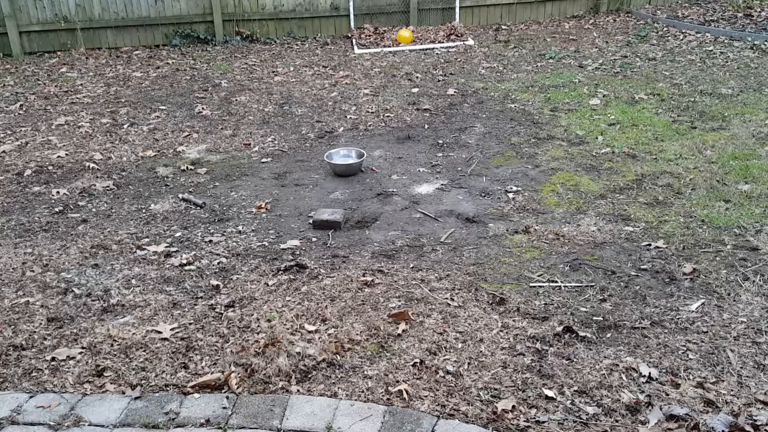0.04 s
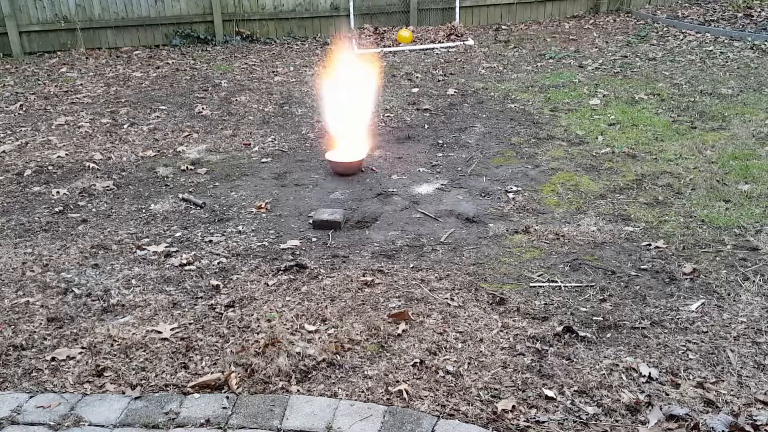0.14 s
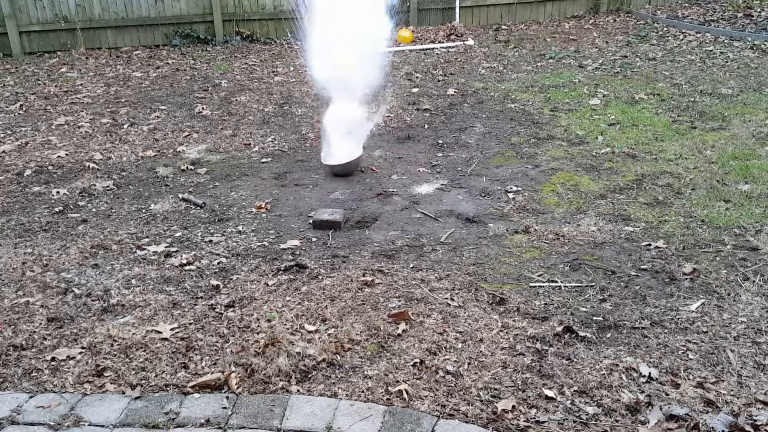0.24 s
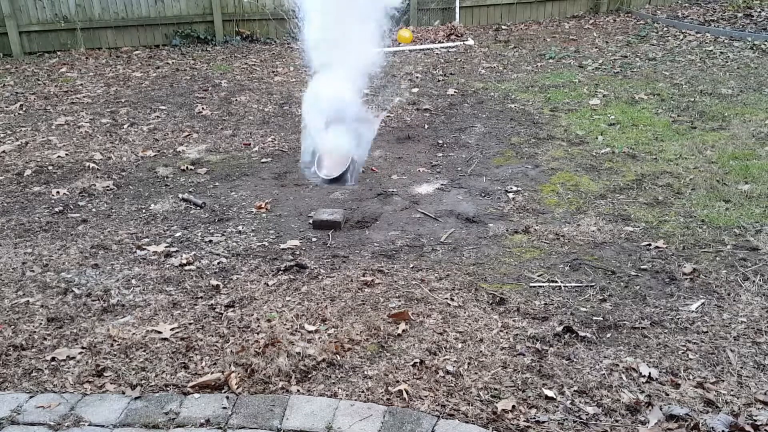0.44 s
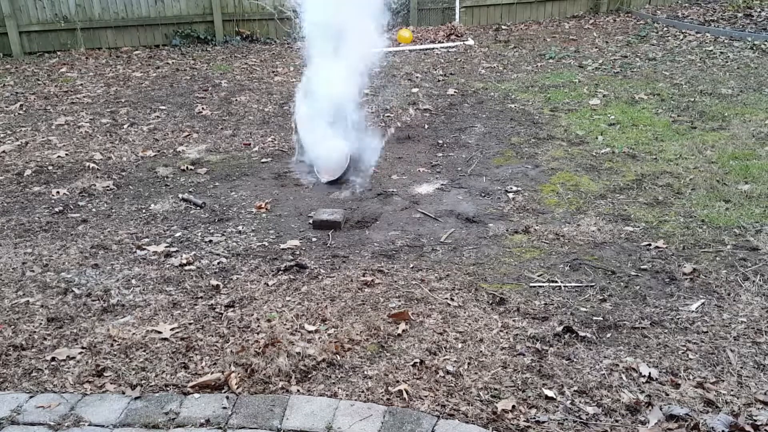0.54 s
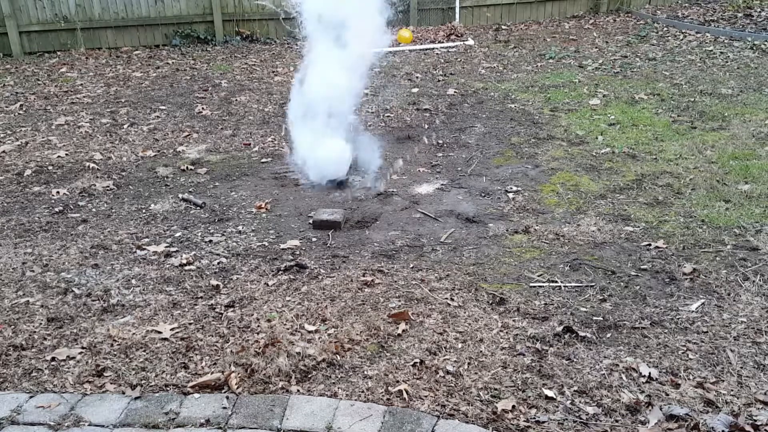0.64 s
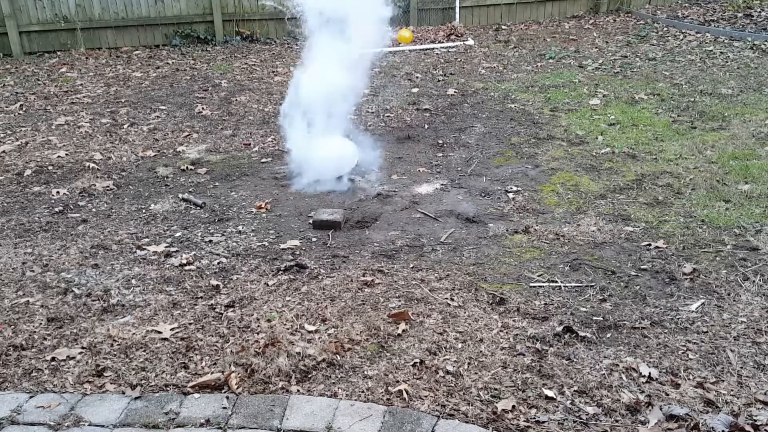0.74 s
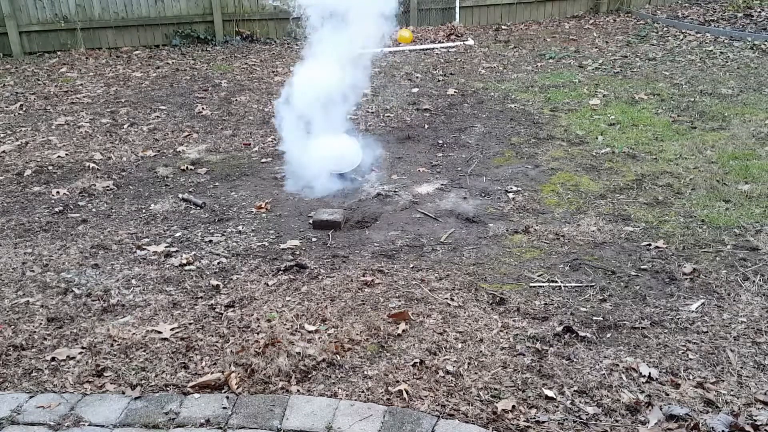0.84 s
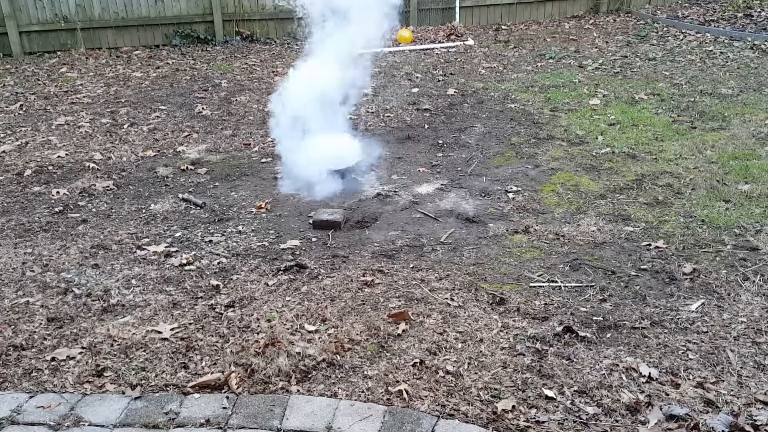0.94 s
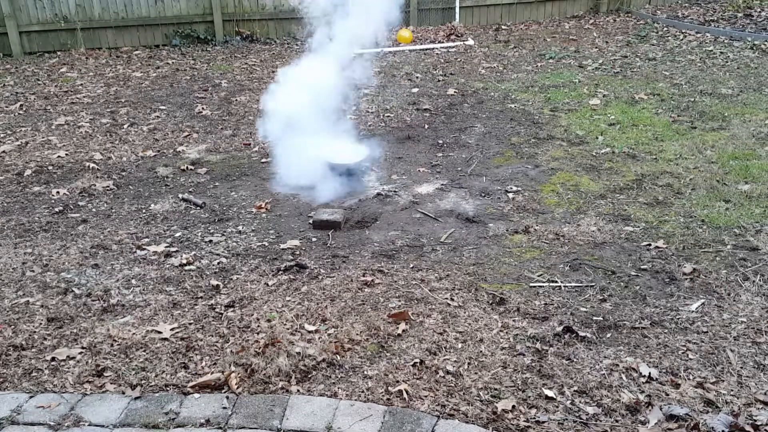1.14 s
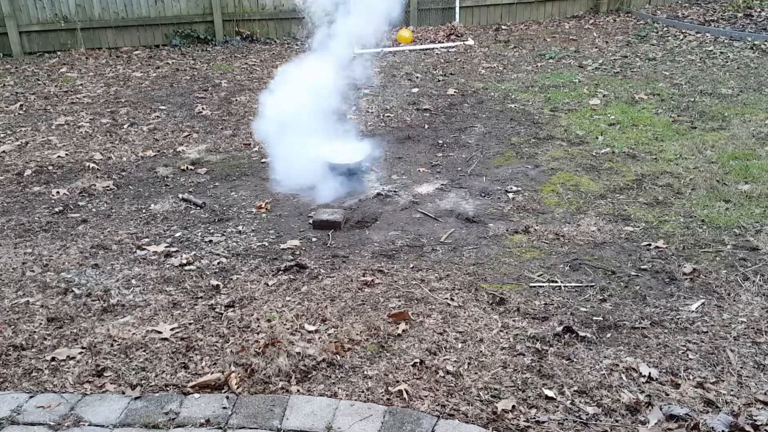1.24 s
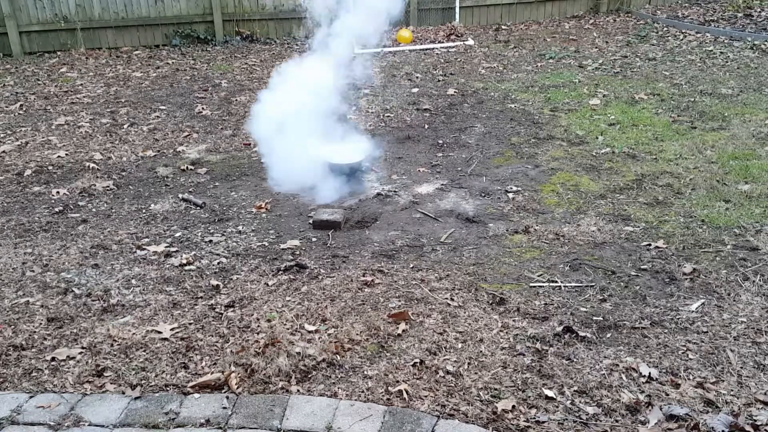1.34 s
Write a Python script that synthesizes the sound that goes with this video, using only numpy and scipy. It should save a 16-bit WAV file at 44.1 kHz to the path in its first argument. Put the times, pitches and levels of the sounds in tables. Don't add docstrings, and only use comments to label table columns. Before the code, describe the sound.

An explosion of reactive metal in water dominates. Quiet suburban air with a very faint insect tone leads to a tiny thump and a sharp, clipped bang at 0.22 seconds, with a brief tearing burst. Hard echo slaps crowd 0.26-0.47 and decay over the next half second into a dull far murmur. From about 0.7, soft hissing patter and dry pops fall on leaves, strongest near 0.78, 1.06 and 1.2.

```python
import sys
import numpy as np
from scipy import signal
from scipy.fft import rfft, irfft, next_fast_len
from scipy.io import wavfile
from scipy.ndimage import uniform_filter1d

SR = 44100
rng = np.random.default_rng(int(sys.argv[2]) if len(sys.argv) > 2 else 0)


def digitize_waveform(pressure):
    field = np.atleast_2d(pressure).T
    bounded = np.clip(field, -1, 1)
    quanta = np.round(bounded * 32767).astype(np.int16)
    wavfile.write(sys.argv[1], SR, quanta)


def volts_from_db(level):
    exponent = np.asarray(level, float) / 20
    return 10 ** exponent


N = 61739
T, M = np.arange(N) / SR, next_fast_len(N)
HZ = np.maximum(np.fft.rfftfreq(M, 1 / SR), 1)
BANG_S = 0.2224
OPPOSITE = np.array([[1], [-1]])


def wave(spectrum):
    return irfft(spectrum, M)[..., :N]


def curve(points, hz):
    p = np.array(points, float)
    return np.interp(np.log(hz), np.log(p[:, 0]), p[:, 1])


def unit(x):
    return x / np.sqrt(np.mean(x ** 2))


def burst(start_s, rise_s, t60_s, hold_s=0.):
    t = np.maximum(T - start_s, 0)
    rise = 1 - np.exp(-t / max(rise_s, 1e-4))
    return rise * volts_from_db(-60 * np.maximum(t - hold_s, 0) / t60_s)


def walk(rate_hz):
    k = int(SR / rate_hz)
    steps = np.repeat(rng.standard_normal(N // k + 1), k)
    return unit(uniform_filter1d(uniform_filter1d(steps, k), k)[:N])


def spread(colour, like=0.94):
    # f/Hz, left-right correlation
    likeness = [(60, 1), (150, 1), (300, 0.94), (640, 0.33), (1400, 0.094), (3100, 0.054), (6800, -0.2),
                (15000, 0)]
    c = np.clip(like * curve(likeness, HZ), -.99, .99)
    mid, side = rfft(rng.standard_normal((2, M))) * volts_from_db(curve(colour, HZ))
    both = np.sqrt(1 + c) * mid + np.sqrt(1 - c) * side * OPPOSITE
    return both / np.sqrt(np.mean(wave(both) ** 2))


def bands(spectrum, shape):
    out = 0
    for hz in 25 * 2 ** np.arange(0, 10, .5):
        window = np.cos(np.pi * np.clip(np.log2(HZ / hz), -.5, .5)) ** 2
        out = out + wave(spectrum * window) * shape(hz)
    return out


def bandpass(x, hz, octaves):
    half = 2 ** (octaves / 2)
    edges_hz = [hz / half, min(hz * half, .45 * SR)]
    return signal.sosfilt(signal.butter(2, edges_hz, "bandpass", fs=SR, output="sos"), x)


def suburb():
    # f/Hz, density/dB
    air_colour = [(25, -18.5), (75, 1), (310, -7.5), (700, -10.5), (1400, -17), (2700, -15.5), (6300, -20),
                  (16000, -22)]
    air_db, insect_db, insect_hz = -57, -76, 2620
    duck_db, recover_s = -7.5, 3
    air = bands(spread(air_colour), lambda hz: volts_from_db(0.5 * walk(8.13)))
    insect = unit(bandpass(rng.standard_normal((2, N)), insect_hz, .1)) * volts_from_db(insect_db + 3 * walk(12))
    recovery = np.exp(-np.maximum(T - BANG_S, 0) / recover_s)
    return (volts_from_db(air_db) * air + insect) * volts_from_db(duck_db * (T > BANG_S) * recovery)


def blast():
    # f/Hz, density/dB
    fire_colour = [(40, -36), (80, -15.5), (150, -14.5), (480, -1), (900, -6.5), (1800, -1.5), (4300, -12),
                   (16000, -25)]
    soil_s, soil_hz, soil_db, soil_rise_s = .2188, 520, -17, .003
    shock_s, shock_db = .14e-3, -6
    fire_db, rise_s, hold_s, t60_1k_s = -3.5, 0.0004, 0.024, 0.11

    thump = np.sin(2 * np.pi * soil_hz * (T - soil_s))
    soil = volts_from_db(soil_db) * thump * burst(soil_s, soil_rise_s, .05)

    u = (T - BANG_S) / shock_s
    shock = -volts_from_db(shock_db) * np.where((u > 0) & (u < 4), np.sin(2 * np.pi * u), 0)

    lumps_db = 1.3 * walk(151.35)

    def tearing(hz):
        fade = burst(BANG_S, rise_s + .6 / hz, t60_1k_s * (1000 / hz) ** 0.35, hold_s)
        return volts_from_db(lumps_db + 4.5 * walk(250)) * fade

    return soil + shock + volts_from_db(fire_db) * bands(spread(fire_colour, like=0.4022), tearing)


def yard():
    # f/Hz, density/dB
    echo_colour = [(40, -41.5), (90, -24), (180, -12), (680, 0.5), (1050, -4), (2200, -6.5), (5000, -20.5),
                   (16000, -27)]
    # f/Hz, t60/s
    echo_t60 = [(60, 1.2), (170, 1.1), (400, 0.69), (1200, 0.8), (3000, 0.68), (6000, 0.58), (9500, 0.46),
                (15000, .31)]
    # t/s, level/dB, centre f/Hz
    slaps = [(0.2567, -4.5, 660), (.266, -8.5, 389), (0.282, -9.5, 462), (.292, -14.5, 640),
             (0.297, -25, 2020), (0.303, -10, 580), (0.31, -8.5, 516), (0.318, -34, 1990),
             (.319, -13.5, 590), (0.33, -12, 594), (0.38, -24, 664), (0.402, -22.5, 563),
             (0.449, -20.5, 714), (0.466, -28, 960)]
    echo_db, rise_s, hold_s = -8, 0.033, 0.017
    patchy_db, swell_db = 1.5, .7
    slap_rise_s, slap_t60_s, slap_hold_s = .0015, .022, 0.0047

    swell = swell_db * walk(70)

    def decay(hz):
        return volts_from_db(swell + patchy_db * walk(80)) * burst(BANG_S, rise_s, curve(echo_t60, hz), hold_s)

    out = volts_from_db(echo_db) * bands(spread(echo_colour), decay)
    for s, db, hz in slaps:
        mid, side = rng.standard_normal((2, N))
        slap = unit(bandpass(mid + .4 * side * OPPOSITE, hz, 0.48))
        out = out + volts_from_db(db) * slap * burst(s, slap_rise_s, slap_t60_s, slap_hold_s)
    return out


def far_murmur():
    # f/Hz, density/dB
    far_colour = [(40, -23.5), (90, -2), (200, -9), (620, -0.1), (1150, -5), (2200, -11.5), (3300, -24),
                  (6000, -42)]
    # t/s, level/dB
    far_level = [(.3, -46), (.7, -47.5), (.9, -48.5), (1.03, -52), (1.15, -49.5), (1.4, -50)]
    p = np.array(far_level)
    roll = volts_from_db(np.interp(T, p[:, 0], p[:, 1])) * burst(BANG_S, .05, 1e4)
    return roll * bands(spread(far_colour), lambda hz: volts_from_db(1.3 * walk(5)))


def patter():
    # f/Hz, density/dB
    click_colour = [(1200, -40), (2600, -18), (3600, -4), (5200, -2), (8500, -8), (16000, -7)]
    # t/s, level/dB, t60/s, top octave/dB
    showers = [
        (.74, -61, .7, 3),
        (.779, -58, .45, 2),
        (.81, -63, .2, 3),
        (1.062, -55, .14, -10),
        (1.078, -58.5, .4, -6),
        (1.164, -59.5, .3, 3),
        (1.223, -58, .45, 3),
        (1.3, -66, 3, 5),
        (1.365, -66, 1, 5),
    ]
    rate_hz, spread_db, floor_db, top_octave_hz = 5000, 2, -72, 9500

    hits = (rng.random((2, N)) < rate_hz / SR) * rng.standard_normal((2, N))
    hits = hits * volts_from_db(spread_db * rng.exponential(size=(2, N)))
    hits = rfft(hits, M) * volts_from_db(curve(click_colour, HZ))
    hits = hits / np.sqrt(np.mean(wave(hits) ** 2))
    flicker = volts_from_db(.8 * walk(120))
    out = 0
    for top in (0, 1):
        power = volts_from_db(2 * floor_db) * (T > .6)
        for s, db, t60_s, top_db in showers:
            power = power + volts_from_db(2 * (db + top * top_db)) * burst(s, .002, t60_s) ** 2
        out = out + wave(hits * ((HZ > top_octave_hz) == top)) * np.sqrt(power) * flicker
    return out


def pops():
    # t/s, peak/dB, centre f/Hz, left-right/dB
    drops = [(.686, -50, 7500, 1), (.695, -50, 7500, 1), (.7770, -37, 8000, 2), (.7864, -44, 5000, 2),
             (.9170, -52, 6000, 1), (.9795, -44, 13000, 0), (.9970, -50, 4500, 1), (1.003, -52, 3500, 1),
             (1.0615, -39, 5200, 2), (1.082, -47, 4500, 1), (1.1630, -41, 7000, 0), (1.2225, -42, 9000, 1),
             (1.278, -46, 10000, 1), (1.293, -51, 8000, 0), (1.312, -52, 4000, 1), (1.353, -55, 8000, 0),
             (1.378, -53, 7500, 0)]
    t60_s, trim_db = 0.0069, 1.5
    snap = rng.standard_normal((2, N))
    out = 0
    for s, db, hz, pan_db in drops:
        pop = bandpass(snap * burst(s, 0.00019, t60_s), hz, 1.6)
        pop = pop / np.abs(pop).max(axis=1, keepdims=True)
        out = out + volts_from_db(db + trim_db + pan_db * OPPOSITE / 2) * pop
    return out


def scene():
    return suburb() + blast() + yard() + far_murmur() + patter() + pops()


def top_cut(x):
    return signal.sosfilt(signal.butter(12, 16460, fs=SR, output="sos"), x)


def record(dry):
    # f/Hz, gain/dB
    mic = [(6500, 0), (8300, 3), (8900, -2), (9550, -13), (10200, -8), (16000, -4.5)]
    left_right_db, hiss_db, knee, low_cut_hz, top_hz = 1.07, -88, 4, 50, 15800
    x = wave(rfft(dry, M) * volts_from_db(curve(mic, HZ))) * volts_from_db(left_right_db * OPPOSITE / 2)
    x = x + volts_from_db(hiss_db) * rng.standard_normal((2, N))
    x = x / (1 + np.abs(x) ** (2 * knee)) ** (.5 / knee)
    x = signal.sosfilt(signal.butter(2, low_cut_hz, "highpass", fs=SR, output="sos"), x)
    x = signal.sosfiltfilt(signal.ellip(8, .1, 40, top_hz, fs=SR, output="sos"), x)
    return top_cut(np.clip(x, -1, 1))


dry = scene()
out = record(dry)
digitize_waveform(out)
```